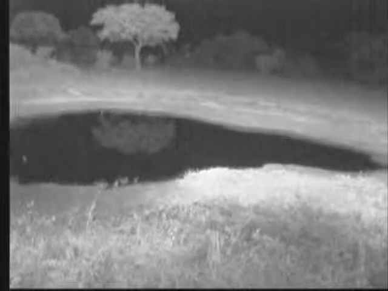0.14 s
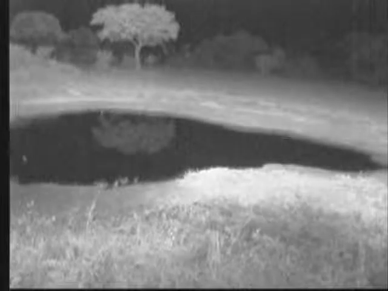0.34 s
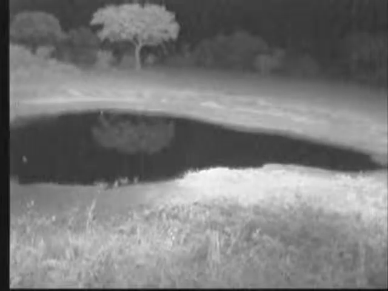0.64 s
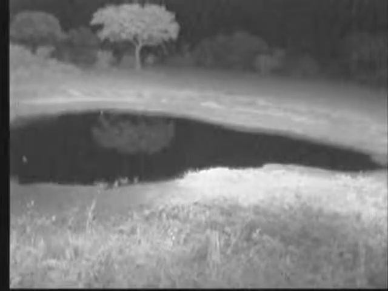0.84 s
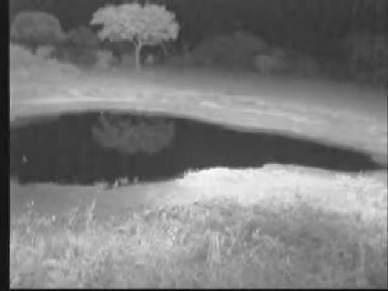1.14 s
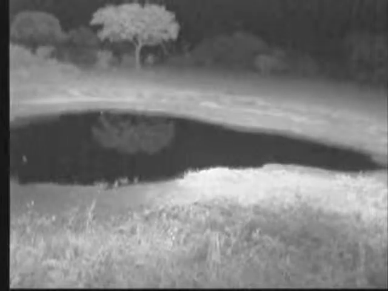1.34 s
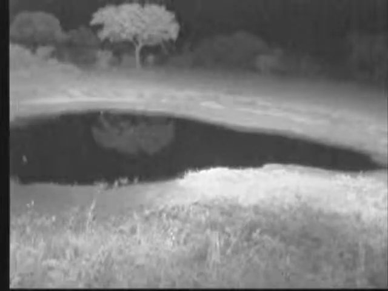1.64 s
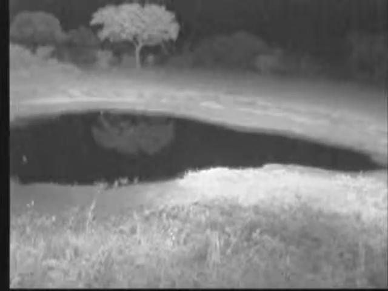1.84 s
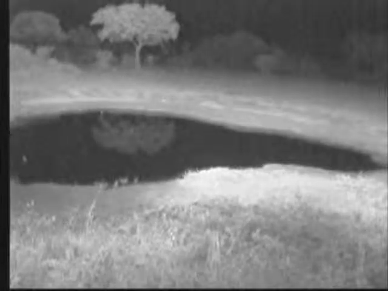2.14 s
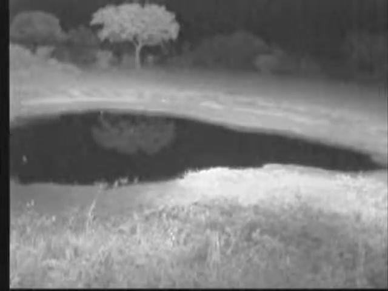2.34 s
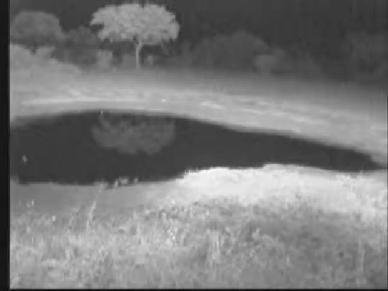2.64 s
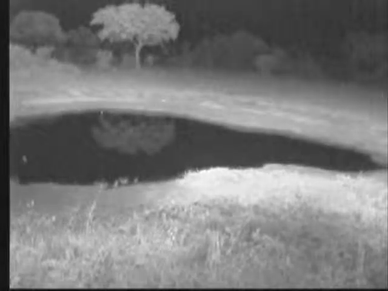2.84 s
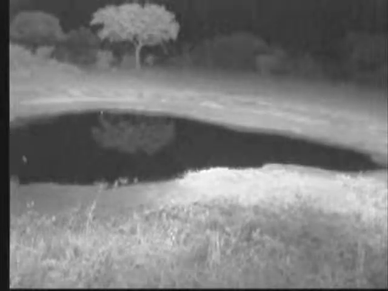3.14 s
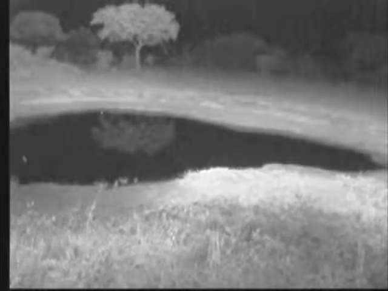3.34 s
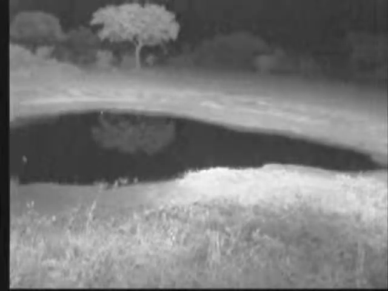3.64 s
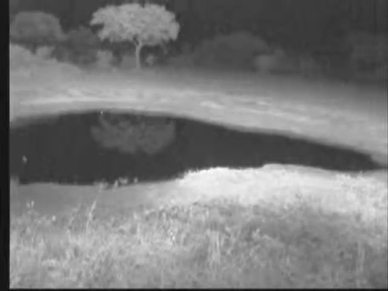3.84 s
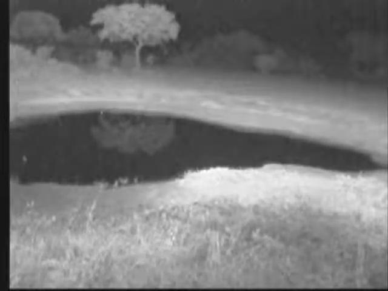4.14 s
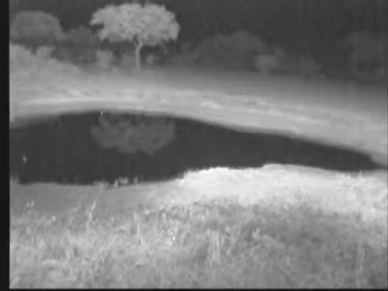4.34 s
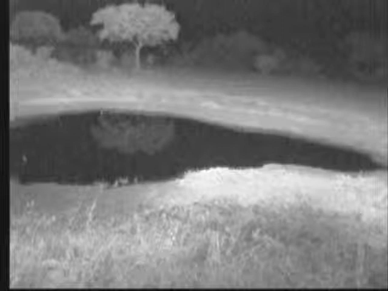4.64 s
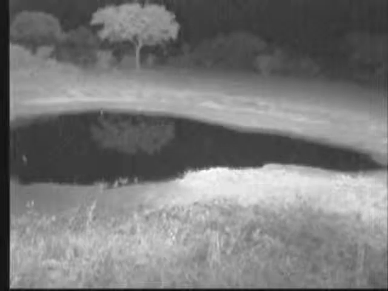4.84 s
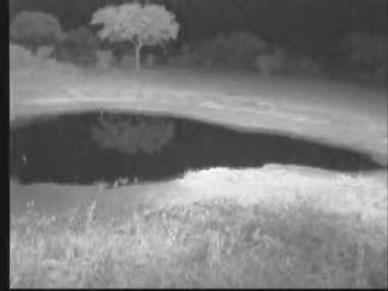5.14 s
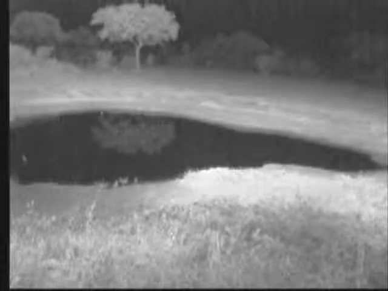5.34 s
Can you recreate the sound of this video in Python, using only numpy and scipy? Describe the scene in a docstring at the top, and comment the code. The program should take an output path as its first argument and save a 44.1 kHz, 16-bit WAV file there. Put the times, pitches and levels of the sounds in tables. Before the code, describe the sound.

A lion ends its roar with a steady row of seven hollow, throaty grunts, the first strongest, each a quarter second long and sagging in pitch. Loud high cricket trills stay in front, a third cricket is faint and distant, and frogs rasp quickly between. Open night air and a far insect chorus hiss softly behind, on a basic mono outdoor microphone with limited peaks.

```python
"""A lion some way off ends its roar with seven deep grunts, at night by a waterhole: flaps of slack vocal
folds and the air between them ring a throat tube over a cleaner chest tone, with fluttering breaths between.
Frogs croak rasping, mostly rising notes, made of a pulsed tone and its octave. Two close crickets and a faint
third chirp in falling near-sines, the close ones heard directly and off the ground. Behind lies coloured noise
of night air and far chorus. A cheap outdoor microphone limits the peaks."""
import sys
import numpy as np
from scipy import signal
from scipy.fft import rfft, irfft
from scipy.io import wavfile
from scipy.ndimage import uniform_filter1d, minimum_filter1d, map_coordinates

SR = 44100
rng = np.random.default_rng(int(sys.argv[2]) if len(sys.argv) > 2 else 0)


def wav_record(signal):
    """Record a signal, one row per channel, as 16-bit PCM in the file named by sys.argv[1]."""
    frames = np.transpose(np.atleast_2d(signal))
    bounded = np.clip(frames, -1, 1)
    # unit amplitude maps onto the largest positive 16-bit level
    quanta = np.round(bounded * 32767).astype(np.int16)
    wavfile.write(sys.argv[1], SR, quanta)


def invert_db(x):
    """Field ratio 10**(x/20) for x, a level in decibels (scalar or array-like)."""
    u = np.asarray(x, float) / 20
    return 10 ** u


N = 242550


def rms_one(x):
    """Normalisation to unit effective value (rms 1)."""
    return x / np.sqrt(np.mean(x ** 2) + 1e-20)


def in_time(rows):
    """Linear interpolation: the columns of a table, after its time column, read at every sample."""
    s, *columns = np.transpose(rows)
    return [np.interp(np.arange(N) / SR, s, column) for column in columns]


def band(x, low_hz, high_hz):
    """Band-pass filtering."""
    return signal.sosfilt(signal.butter(2, [low_hz, high_hz], "band", fs=SR, output="sos"), x)


def drift(rate_hz):
    """Low-passed noise: slow chance of rms 1, taken after the filter has settled for a second."""
    low_pass = signal.butter(2, rate_hz, fs=SR, output="sos")
    return rms_one(signal.sosfilt(low_pass, rng.standard_normal(N + SR))[SR:])


def coloured(x, spectrum):
    """Spectral shaping: weight the input by a gain curve in dB over log frequency, then scale to rms 1."""
    hz, db = np.transpose(spectrum)
    grid = np.maximum(np.arange(N // 2 + 1) * SR / N, 1)
    gain = invert_db(np.interp(np.log(grid), np.log(hz), db))
    return rms_one(irfft(rfft(x) * gain, N))


def resonance(x, hz, width_hz):
    """Damped resonator: two poles, gain near 1 at the top."""
    r = np.exp(-np.pi * width_hz / SR)
    numerator = [(1 - r * r) / 2, 0, (r * r - 1) / 2]
    denominator = [1, -2 * r * np.cos(2 * np.pi * hz / SR), r * r]
    return signal.lfilter(numerator, denominator, x)


def evened(x, over_s):
    """Level equalisation: divide by the running effective value."""
    return x / np.sqrt(uniform_filter1d(x * x, int(over_s * SR)) + 1e-12)


def scattered(x, t60_s):
    """Diffuse scattering from reeds, banks and bushes: convolution with a dying noise spray of energy 1."""
    t = np.arange(int(t60_s * SR)) / SR
    onset = np.minimum(t / 0.0067, 1)
    spray = rng.standard_normal(SR)[:len(t)] * invert_db(-60 * t / t60_s) * onset
    return signal.fftconvolve(x, spray / np.sqrt(np.sum(spray ** 2)))[:N]


# The seven grunts. Each row: onset in seconds, loudest after seconds, lets go after seconds,
# chest tone in dB and growl in dB (before the offset of each part), pitch at the end in Hz.
GRUNT_ROWS = [(.268, 0.15, 0.23, -15.5, -25.5, 123), (1.023, 0.13, 0.23, -21, -25, 114),
              (1.772, 0.15, .215, -21, -26, 120), (2.521, 0.19, 0.2, -18.5, -26, 103.2),
              (3.269, 0.096, .212, -22, -28.5, 115), (4.009, 0.14, 0.22, -23, -27, 116),
              (4.787, .17, .203, -19, -27, 126.3)]


def effort(shape, levels_db):
    """Amplitude envelope of one part of the voice over all grunts: attack, swell to the peak, sag, release."""
    late_s, attack, swell, sag, lingers_s, release, offset_db = shape
    onset_db = -41      # against the level of the part
    u = np.arange(SR // 2) / SR     # seconds since the onset
    out = np.zeros(N + SR)
    for (s, peak_s, end_s, *_), level_db in zip(GRUNT_ROWS, levels_db):
        rising = onset_db + attack * (u - late_s)
        held = -swell * np.maximum(peak_s - u, 0) - sag * np.maximum(u - peak_s, 0)
        held = held - release * np.maximum(u - end_s - lingers_s, 0)
        start = int(s * SR)
        out[start:start + len(u)] += invert_db(level_db + offset_db + np.minimum(rising, held))
    return out[:N]


def chest_pitch():
    """Pitch rises with effort: stronger grunts start higher, and each glides to its end pitch."""
    base_hz, hz_per_db = 167, 1.24
    sag_from = .74      # share of the grunt after which the pitch glides
    points = []
    for s, _, end_s, chest_db, _, last_hz in GRUNT_ROWS:
        first_hz = base_hz + hz_per_db * chest_db
        points += [(s, first_hz), (s + sag_from * end_s, first_hz)]
        points += [(s + 1.1 * end_s, last_hz), (s + 2 * end_s, last_hz)]
    return in_time(points)[0]


# Resonances of the long vocal tube, lower and upper.
# Each row: centre in Hz, width in Hz, relative level in dB.
THROAT_MODES = [(168, 94, -2), (250, 150, -1.5), (337.6, 32, 2.5), (457.5, 25, -1.5), (537, 33, -1.5)]
MOUTH_MODES = [(724, 24, 0), (853, 24, -1), (997, 24, -5)]


def vocal_tube(source):
    """Source-filter principle: parallel resonators of alternating sign; tongue and jaw shift their balance."""
    modes = THROAT_MODES + MOUTH_MODES
    shaping = [invert_db(3.9 * drift(5.86)) for _ in modes]
    rings = []
    for k, (hz, width_hz, db) in enumerate(modes):
        gain = (-1) ** k * shaping[k] * invert_db(db) / np.sqrt(width_hz)
        rings.append(gain * resonance(source, hz, width_hz))
    throat = evened(band(sum(rings[:len(THROAT_MODES)]), 130, 1300), .06)
    mouth = evened(band(sum(rings[len(THROAT_MODES):]), 600, 1300), 0.066)
    return throat, mouth


# Spectrum given to the rasp. Each row: frequency in Hz, relative gain in dB.
RASP_SPECTRUM = [(650, -39), (1100, -7.5), (1480, -6), (1600, -4), (2330, -10.5), (2660, -19),
                 (3500, -14.5), (4550, -37), (7700, -120)]
# How each part of the voice follows a grunt. Each row: late by seconds, attack in dB/s, swell in dB/s,
# sag in dB/s, lingers for seconds, release in dB/s, offset in dB.
CHEST_EFFORT = (0.001, 584.5, 80.5, 59, .001, 270, 0.3)
THROAT_EFFORT = (-.012, 400, 55, 51, .02, 200, 0.1)
MOUTH_EFFORT = (0, 560.5, 70, 70, .045, 240, -1.3)
RASP_EFFORT = (.01, 500, 90, 55, .022, 190, -8)


def lion():
    """Self-oscillation of slack folds: uneven flaps and the air between them drive the tube over a chest tone."""
    unsteady, wander, strength = drift(35), drift(30), invert_db(3.0 * drift(40))
    tube_noise, rasp_noise = rng.standard_normal((2, N))
    flaps_per_s = 48.0 - .8 * np.arange(N) / SR     # slower as the lion tires
    cycle = np.cumsum(flaps_per_s * (1 + .3 * unsteady)) / SR
    flaps = strength * np.diff(np.floor(cycle), prepend=0)
    puff = strength * (0.39 + np.exp(-2.5 * (cycle % 1)))      # air flow dies down after each flap
    source = .5 * rms_one(flaps) + rms_one(puff) * tube_noise
    throat, mouth = vocal_tube(source)

    chest_turn = 2 * np.pi * np.cumsum(chest_pitch() * (1 + .025 * wander)) / SR
    chest_tone = np.sin(chest_turn) * (1 + .3 * np.cos(2 * np.pi * cycle))
    chest = np.sqrt(2) * chest_tone + .32 * rms_one(band(source, 70, 210))
    rasp = coloured(rms_one(np.sqrt(puff)) * rasp_noise + .1 * rms_one(flaps), RASP_SPECTRUM)

    chest_db, growl_db = np.transpose(GRUNT_ROWS)[3:5]
    out = effort(CHEST_EFFORT, chest_db) * chest + effort(THROAT_EFFORT, growl_db) * throat
    out = out + effort(MOUTH_EFFORT, growl_db) * mouth + effort(RASP_EFFORT, growl_db) * rasp
    return out + invert_db(-19) * scattered(out, t60_s=.6)


# Breaths between grunts. Each row: start in seconds, length in seconds, low flutter in dB, throat hum in dB.
BREATH_ROWS = [(0.803, 0.15, -54.5, -66), (1.33, 0.48, -60, -52.5), (2.099, .12, -58, -64),
               (2.261, 0.21, -42.5, -65), (2.855, 0.25, -64, -57.5), (3.048, 0.35, -48.5, -68),
               (3.581, .14, -52, -58), (3.726, .34, -53, -67), (4.296, 0.39, -58, -54.5),
               (5.02, 0.18, -51, -58)]


def breath():
    """Turbulence noise: air drawn in between grunts flutters low and hums in one throat resonance."""
    out, t = np.zeros(N), np.arange(N) / SR
    flutter = rms_one(band(rng.standard_normal(N), 60, 170)) * invert_db(3.0 * drift(20))
    hum = rms_one(resonance(resonance(rng.standard_normal(N), 340, 60), 340, 60))
    for s, length_s, flutter_db, hum_db in BREATH_ROWS:
        swell = np.sin(np.pi * np.clip((t - s) / length_s, 0, 1) ** .8) ** 2
        out += swell * (invert_db(flutter_db) * flutter + invert_db(hum_db) * hum)
    return out


# Frog croaks. Each row: start in seconds, length in seconds, first pitch in Hz, last pitch in Hz,
# level in dB before the vocal sac.
CROAK_ROWS = [(-.06, .24, 1693, 2038, -35.5), (0.184, 0.13, 1880, 1993, -49.5),
              (0.446, .17, 1826, 1940, -39.5), (0.613, 0.13, 1817, 1950, -42),
              (0.855, .26, 1761, 2046, -35), (1.259, .2, 1784, 2008, -39), (1.456, .16, 1840, 1963, -38),
              (1.632, .18, 1730, 1990, -41), (2.031, .15, 1752, 1964, -39), (2.308, 0.2, 1940, 2090, -40.5),
              (2.358, .14, 1772, 1916, -41.5), (2.739, 0.13, 1887, 2167, -36),
              (2.853, 0.28, 1700, 2018, -39), (3.179, 0.077, 1740, 1734, -47.5),
              (3.304, .1, 2010, 2070, -40.5), (3.448, 0.11, 1700, 1904, -41), (3.653, .22, 1708, 1986, -41),
              (3.82, .17, 1925, 2080, -42.5), (3.964, 0.22, 1980, 1918, -38.5),
              (4.359, 0.25, 1810, 2043, -36), (4.708, 0.21, 1744, 2061, -39.5),
              (5.063, .3, 1896, 2015, -40.5), (5.403, 0.15, 1663, 1875, -35)]
# Octave partial, weakest on the highest croaks.
# Each row: mean of first and last pitch in Hz, level against the first partial in dB before the vocal sac.
OCTAVE_LEVEL = [(1800, -2), (1900, 0), (1960, -3.5), (2040, -13)]


def frogs():
    """Amplitude modulation: a fast uneven pulse train on a gliding tone and its octave, blurred by the reeds."""
    out, t = np.zeros(N), np.arange(N) / SR
    pace, waver, size = drift(39.8), drift(100), invert_db(4.5 * drift(55))
    pulse_rates = rng.uniform(90, 140, len(CROAK_ROWS))
    for (s, length_s, first_hz, last_hz, db), per_s in zip(CROAK_ROWS, pulse_rates):
        now = slice(max(int(s * SR) + 1, 0), min(int((s + length_s) * SR), N))
        part = np.clip((t[now] - s) / length_s, 0, 1)
        swell = np.abs(np.sin(np.pi * part ** 1.1)) ** .8

        pulse_phase = np.cumsum(per_s * (1 + 0.1788 * pace[now])) / SR % 1
        pulses = size[now] * np.abs(np.sin(np.pi * pulse_phase ** 1.19)) ** 1.1

        glide_hz = first_hz + (last_hz - first_hz) * np.sin(np.pi / 2 * part ** .95)     # levels off
        turn = 2 * np.pi * np.cumsum(glide_hz * (1 + .026 * waver[now])) / SR
        octave_db = np.interp((first_hz + last_hz) / 2, *np.transpose(OCTAVE_LEVEL))
        tone = np.sqrt(2) * (np.sin(turn) + invert_db(octave_db) * np.sin(2 * turn))
        out[now] += swell * invert_db(db) * rms_one(pulses) * tone
    out = resonance(out, 1950, 900) + resonance(out, 3754, 660)     # the vocal sac favours two bands
    return 0.86 * out + 0.71 * scattered(out, t60_s=0.2)


def cricket(chirps, gap_ms, stroke, first_db, slowing, catch_hz, count):
    """Stridulation: each chirp is a few wing strokes, each a falling near-sine; slowing stretches the gaps."""
    ms, hz, height = np.transpose(stroke)
    t_ms = np.arange(int(ms[-1] * SR / 1000)) * 1000 / SR
    stroke_hz, stroke_height = np.interp(t_ms, ms, hz), np.interp(t_ms, ms, height)
    out = np.zeros(N + 2 * SR)      # a second to spare at either end
    chance = rng.standard_normal((len(chirps), count, 4))
    for (s, db), draws in zip(chirps, chance):
        for k, (pitch, phase, level, catch) in enumerate(draws):
            late_ms = k * gap_ms * (1 + slowing * (k - 1))
            at = SR + round(SR * (s + late_ms / 1000))
            high_catch = catch_hz * abs(catch) * np.exp(-t_ms / 2.2)     # the scraper may set in high
            turn = 2 * np.pi * np.cumsum(stroke_hz + high_catch + 6.2 * pitch) / SR + 9 * phase
            gain = invert_db(db + first_db * (k == 0) + 0.7 * level)
            wave = np.sin(turn) + invert_db(-55.5) * np.sin(2 * turn)
            out[at:at + len(t_ms)] += gain * stroke_height * wave
    return out[SR:SR + N]


def with_echo(x, lag_ms, db):
    """Specular reflection: direct sound plus one delayed copy from the ground."""
    late = np.arange(N) - in_time(lag_ms)[0] * SR / 1000
    return x + invert_db(db) * map_coordinates(x, [late], order=3)


# Chirps; each singer keeps its own time.
# Each row: start in seconds, nominal stroke level in dB before the wing's resonance.
NEAR_SONG = [(-0.0163, -11.9), (0.2378, -11.9), (0.5016, -12.5), (0.7177, -12.0), (0.9575, -11.8),
             (1.1848, -12.3), (1.4085, -11.7), (1.655, -11.6), (1.9023, -12.4), (2.1161, -11.6),
             (2.3887, -11.7), (2.5895, -12.7), (2.8511, -12.3), (3.139, -12.3), (3.3765, -12.4),
             (3.5866, -12.2), (3.8826, -13.5), (4.1128, -15.2), (4.3341, -14.4), (4.5731, -14.1),
             (4.7984, -12.6), (5.0217, -12.1), (5.2512, -12.0)]
SECOND_SONG = [(0.1289, -12), (0.3873, -13), (0.6574, -13), (0.9532, -12.5), (1.2371, -12.5),
               (1.5053, -12.5), (1.779, -12), (2.0611, -12), (2.3358, -12.5), (2.6138, -12), (2.895, -11.5),
               (3.177, -10.5), (3.461, -11), (3.7803, -11), (4.0596, -10.5), (4.3297, -12.5),
               (4.5976, -11.5), (4.8711, -12), (5.1347, -12), (5.392, -10.5)]
FAR_SONG = [(.06, -36), (.82, -35.5), (1.075, -33), (2.0, -25), (2.255, -28.5), (2.53, -35.5),
            (2.77, -27.5), (3.043, -24.5), (3.315, -20), (4.19, -26.5), (4.455, -24.5), (4.72, -21.5)]
# One wing stroke; the pitch falls as the scraper slows.
# Each row: time in milliseconds, nominal pitch in Hz, relative height.
NEAR_WING = [(0, 5105, 0), (2.8, 5108, 1.08), (6, 5108, 1.08), (11.7, 5010, 1.08), (17.2, 4855, 1.08),
             (19.2, 4780, .02)]
SECOND_WING = [(0, 5330, .02), (1.6, 5290, .17), (4, 5260, .33), (7.5, 5232, .62), (12, 5190, .95),
               (15, 5155, .95), (22.5, 4880, .95), (24.4, 4780, .02)]
FAR_WING = [(0, 5120, 0), (6, 5080, .7), (13, 4990, .95), (19, 4850, .7), (22, 4800, .02)]
# Ground echoes; the path shifts a little with the air. Each row: time in seconds, lag in milliseconds.
NEAR_ECHO = [(0, 7.81), (1.5, 7.818), (5.5, 7.792)]
SECOND_ECHO = [(0, 1.668), (5.5, 1.672)]


def crickets():
    """Resonant radiation: wing harps sound two close singers and a faint third, scattered by the surroundings."""
    near = cricket(NEAR_SONG, 32.9, NEAR_WING, first_db=-1.1, slowing=0, catch_hz=0, count=3)
    near = with_echo(near, NEAR_ECHO, db=.8)
    second = cricket(SECOND_SONG, 34.15, SECOND_WING, first_db=-0.86, slowing=0.015, catch_hz=520, count=4)
    second = with_echo(second, SECOND_ECHO, db=-3.5)
    far = cricket(FAR_SONG, 31.2, FAR_WING, first_db=-2, slowing=0, catch_hz=0, count=3)
    direct = resonance(near + second + far, 5050, 1500)     # the wing's harp radiates one band

    # noise of the second cricket's scraper on the file
    stroke_level = np.sqrt(uniform_filter1d(second ** 2, size=200) + 1e-12) * invert_db(6.0 * drift(7.8))
    scratch = rms_one(band(band(rng.standard_normal(N), 5100, 6110), 4800, 6230))
    direct = direct + invert_db(-28.5) * stroke_level * scratch
    return direct + invert_db(-11) * scattered(direct, t60_s=.18)


# Spectrum of night air and far chorus. Each row: frequency in Hz, relative gain in dB.
AIR_SPECTRUM = [(30, -14.5), (55, -9), (150, -8.5), (340, -9), (1400, -15), (1900, -7.5), (2400, -20),
                (3200, -22), (3800, -5.5), (4400, -16), (5000, 3), (5600, -5), (6500, -33), (7500, -57)]


def night_air():
    """Stationary coloured noise: night air and far chorus as one steady bed."""
    return invert_db(-47) * coloured(rng.standard_normal(N), AIR_SPECTRUM)


def scene():
    """Superposition: all voices add over the night air, in one channel."""
    return (lion() + breath() + frogs() + crickets() + night_air())[None]


def top_cut(x):
    """Nothing passes above the cut-off."""
    return signal.sosfilt(signal.butter(12, 12800, fs=SR, output="sos"), x)


def record(dry):
    """Peak limiting and saturation: a fast limiter, a small steady offset, then a firm knee for overshoots."""
    limit, offset = .5, 0.016
    top, knee = .52, 8.3        # level the preamp cannot pass, firmness of the bend
    peak = -minimum_filter1d(-np.abs(dry), int(0.0015 * SR))
    gain = uniform_filter1d(np.minimum(1, limit / (peak + 1e-9)), int(0.0045 * SR))
    held = dry * gain + offset
    bent = held / (1 + (np.abs(held) / top) ** knee) ** (1 / knee)
    return top_cut(bent)


dry = scene()
out = record(dry)
wav_record(out)
```